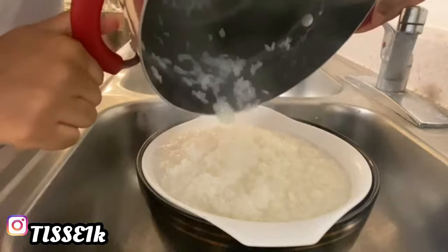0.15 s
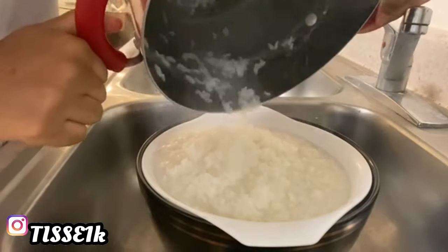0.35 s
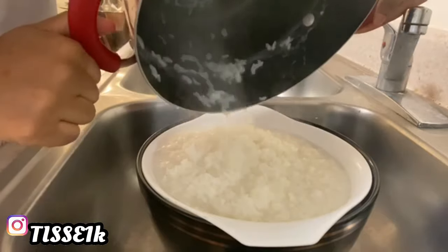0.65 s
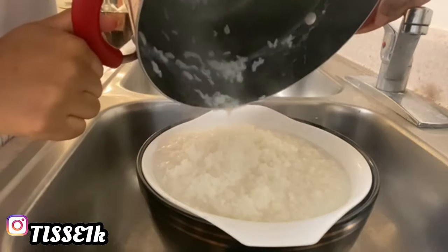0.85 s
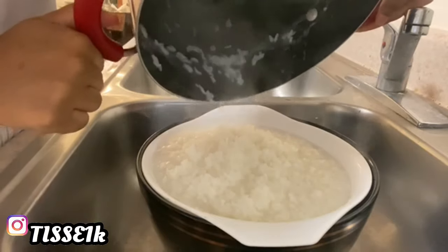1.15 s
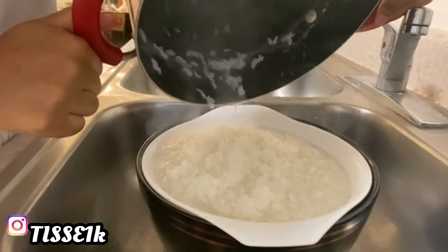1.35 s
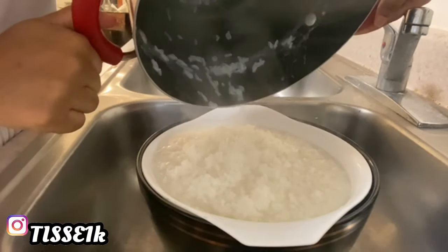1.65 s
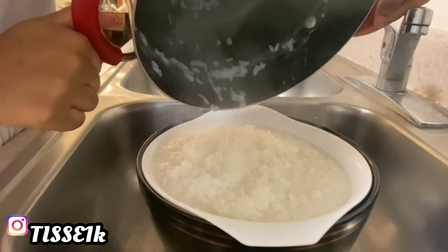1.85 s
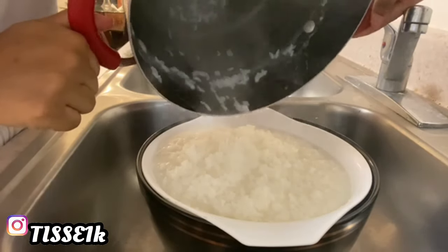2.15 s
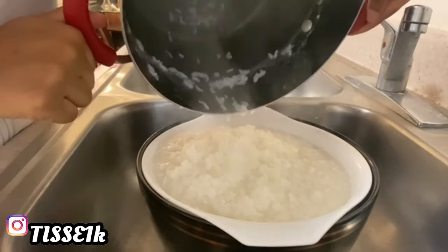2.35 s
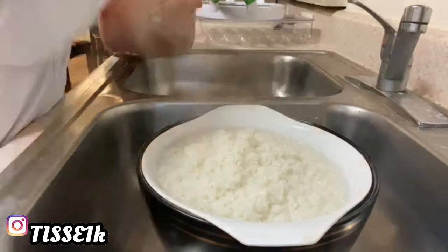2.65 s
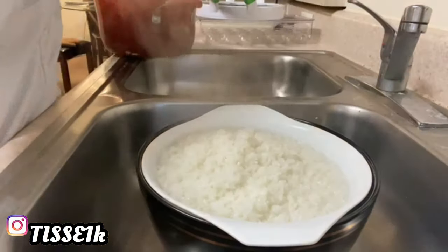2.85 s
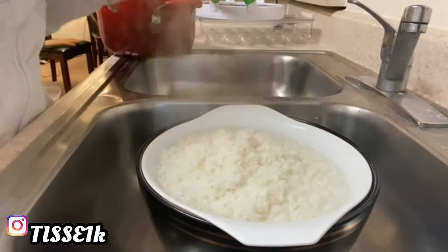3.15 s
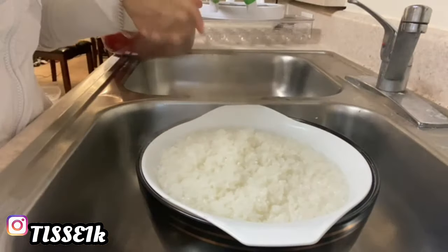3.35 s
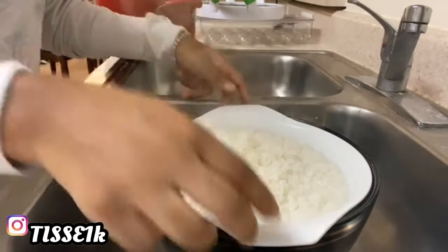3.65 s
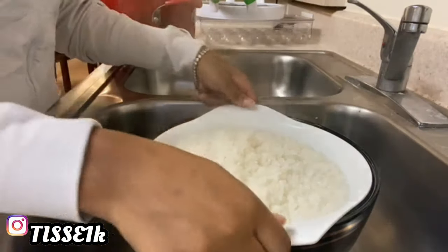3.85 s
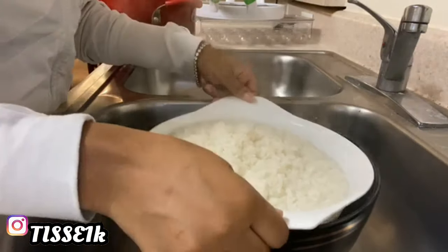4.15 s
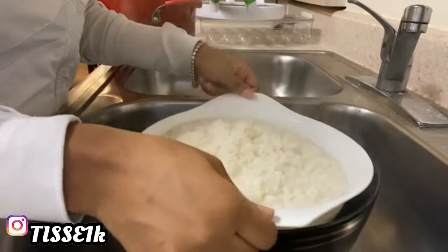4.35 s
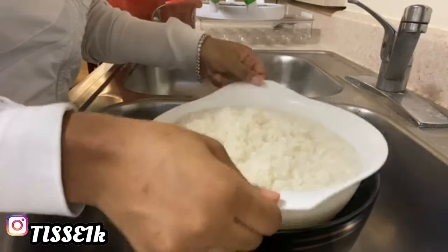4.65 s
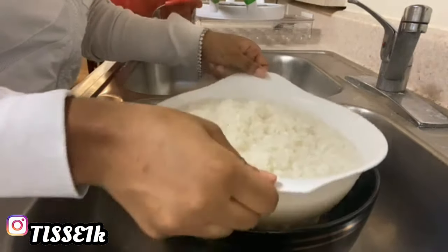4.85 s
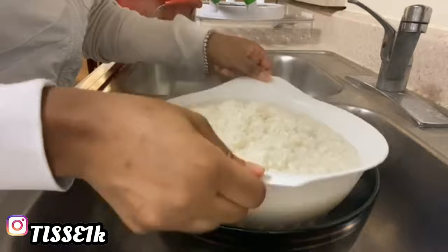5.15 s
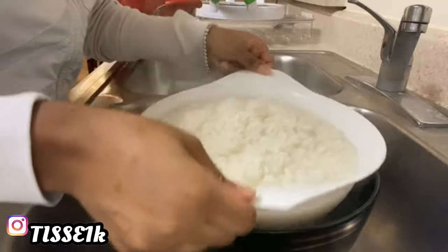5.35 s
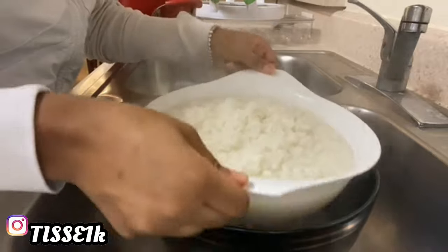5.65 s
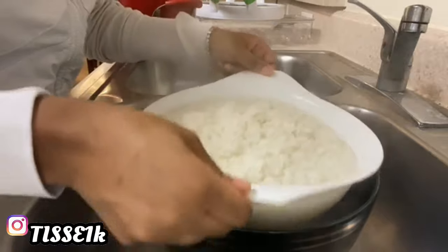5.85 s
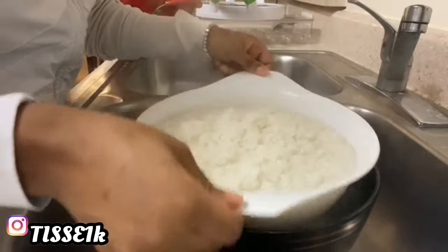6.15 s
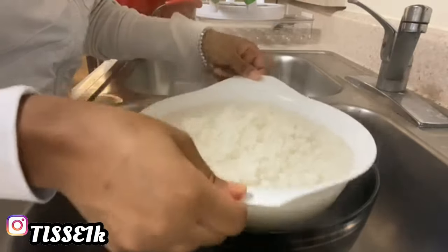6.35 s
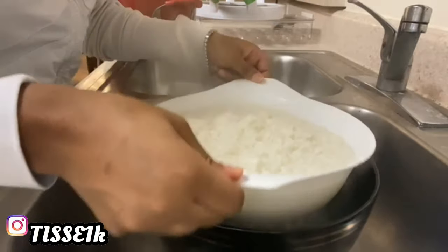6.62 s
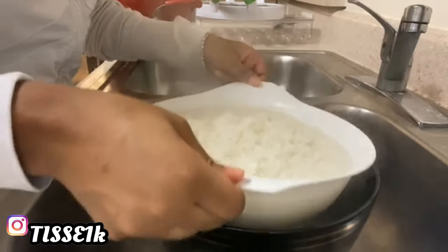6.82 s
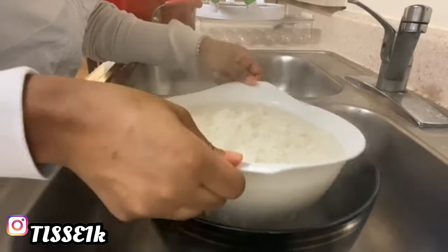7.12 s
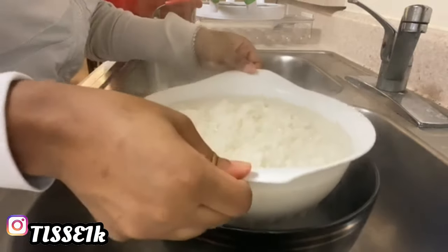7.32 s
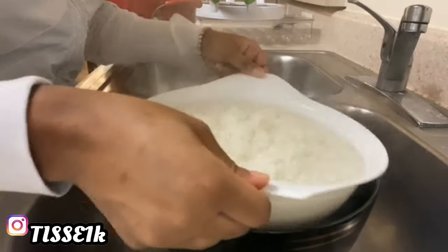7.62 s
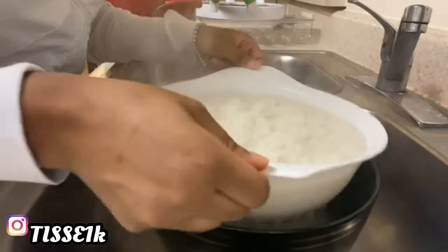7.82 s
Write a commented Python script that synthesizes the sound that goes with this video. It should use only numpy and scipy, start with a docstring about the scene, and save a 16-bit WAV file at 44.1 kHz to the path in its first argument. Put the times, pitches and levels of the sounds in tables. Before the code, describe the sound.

In a small tiled kitchen, a fan hums low with soft hiss. A few hollow plastic knocks boom in a steel sink, the level dips briefly, and a pan is set down further off. Hands grip a colander of rice and clack it against the pot, which rings shortly. Bracelet beads tick during shaking, then a sharp double knock. Close stereo microphone, short room echo.

```python
"""A plastic colander of rice knocks against a pot in a steel kitchen sink: noise bursts shake the plastic wall,
fading sine waves ring the sink sheet and the pot, and sharp snaps and low thuds join them. A pan is set down
further off, bracelet beads tick in high resonances, and hands slide as swelling grainy noise.
Behind them a fan hums and hisses in a small tiled kitchen. Once the level dips briefly, and the hiss is a
little louder afterwards."""
import sys
import numpy as np
from scipy import signal
from scipy.fft import rfft, irfft, next_fast_len
from scipy.io import wavfile
from scipy.ndimage import uniform_filter1d, map_coordinates

SR = 44100
rng = np.random.default_rng(int(sys.argv[2]) if len(sys.argv) > 2 else 0)


def int16_out(signal):
    """Quantize to a 16-bit WAV file."""
    q = np.round(np.clip(np.atleast_2d(signal).T, -1, 1) * 32767)
    wavfile.write(sys.argv[1], SR, q.astype(np.int16))


N = 351824  # length in samples


def amp(db):
    """Turns a level in dB into a gain."""
    return 10 ** (np.asarray(db) / 20)


def unit(x):
    """Scales a sound to rms 1."""
    return x / np.sqrt(np.mean(x ** 2) + 1e-20)


def peaked(x, db):
    """Scales a sound to a peak level in dB."""
    return amp(db) * x / np.abs(x).max()


def along(points, hz):
    """Reads a curve of (Hz, value) points on a log frequency axis."""
    f, v = np.transpose(points)
    return np.interp(np.log(hz + 1), np.log(f + 1), v)


def wobble(rate, size=N):
    """Draws a smooth random curve with 'rate' random points a second."""
    knots = rng.standard_normal(int(size * rate / SR) + 4)
    return map_coordinates(knots, [np.arange(size) * rate / SR])


def filtered(x, response):
    """Multiplies the spectrum of x by a response, given as a function of frequency."""
    n = x.shape[-1]
    m = next_fast_len(n + 8192)  # spare room for the filter to ring out
    return irfft(rfft(x, m) * response(np.fft.rfftfreq(m, 1 / SR)), m)[..., :n]


def resonances(peaks):
    """Response of a body with (Hz, width Hz, dB) resonances, which ring only after the push."""
    def response(f):
        total = 0
        for k, (centre, width, db) in enumerate(peaks):
            peak = 1j * f * width / (centre * centre - f * f + 1j * f * width)
            total = total + (-1) ** k * amp(db) * peak  # neighbours have opposite signs
        return total
    return response


# How alike the background noise is on the left and right.
# Each row: frequency in Hz, likeness (1 is the same, 0 is unrelated).
LIKENESS = [(25, 0.82), (60, 1), (130, 0.9), (290, 1), (640, 0), (1400, 0.02)]


def rush(response, patchy_db=0):
    """Stereo noise of rms 1 in patches of random gain, alike in the bass and unrelated in the treble."""
    z = signal.stft(rng.standard_normal((2, N)), nperseg=2048)[2]
    patches = uniform_filter1d(rng.standard_normal(z.shape[1:]), size=5, axis=0)
    patches = uniform_filter1d(patches, size=5, axis=1)
    pair = signal.istft(z * amp(patchy_db * unit(patches)), nperseg=2048)[1][:, :N]

    def middle_and_side(hz):
        turn = np.arccos(np.clip(along(LIKENESS, hz), -1, 1)) / 2
        return response(hz) * [np.cos(turn), np.sin(turn)]
    mid, side = filtered(pair, middle_and_side)
    return unit(np.array([mid + side, mid - side]))


def wavering(peaks, waver_db):
    """Narrow bands of noise, each swelling and fading on its own."""
    total = 0
    for hz, width, db in peaks:
        total = total + amp(db + waver_db * wobble(4.0)) * rush(resonances([(hz, width, 0)]))
    return total


LAG_S = .00029  # knocks and rings arrive this much later on the left


def lagged(f):
    """Delays the left side only, by turning its phase."""
    return np.exp(-2j * np.pi * f * LAG_S * np.array([[1], [0]]))


def ring(modes, t, scatter_db, colour_db, rise, blur):
    """Fading sine waves of a struck body, with random strengths and wandering phase, later on the left."""
    shifted = t - LAG_S / 2 * np.array([[1], [-1]])
    total = 0
    for hz, db, t60 in modes:
        level = db + colour_db(hz) + rng.normal(0, scatter_db)
        phase = 2 * np.pi * hz * shifted + blur * wobble(47.8, size=len(t))
        total = total + amp(level - 60 * t / t60) * np.sin(phase)
    return total * (1 - np.exp(-(t / rise) ** 2))


def burst(t, t60, alike, rise=0.00022):
    """A stereo rattle of noise that rises fast and dies; 'alike' is the share common to both sides."""
    noise = rng.standard_normal((3, len(t)))
    mixed = alike * noise[2] + (1 - alike) * noise[:2]
    return (1 - np.exp(-(t / rise) ** 2)) * amp(-60 * t / t60) * mixed


# How long the tiled kitchen echoes. Each row: frequency in Hz, time to fall by 60 dB in seconds.
ECHO_TIMES = [(200, 0.62), (1000, 0.29), (4000, 0.31), (12000, 0.2)]


def echoed(x, wet_db):
    """Adds the kitchen's answer: a noise tail in which each frequency dies at its own speed."""
    hz, t, z = signal.stft(rng.standard_normal((2, SR // 3)), SR, nperseg=256)
    fading = amp(-60 * t / along(ECHO_TIMES, hz)[:, None])
    tail = signal.istft(z * fading, SR, nperseg=256)[1]
    delayed = np.pad(x, ((0, 0), (250, 0)))  # the answer starts 250 samples late
    wet = signal.fftconvolve(delayed, tail / np.linalg.norm(tail[0]), axes=1)
    return x + amp(wet_db) * wet[:, :x.shape[1]]


def add(out, s, x, pan_db=0):
    """Places a stereo sound at s seconds; a positive pan_db leans left."""
    part = out[:, round(s * SR):][:, :x.shape[1]]
    part += (x * amp([[pan_db / 2], [-pan_db / 2]]))[:, :part.shape[1]]


# Tone colour of the low rumble. Each row: frequency in Hz, relative level in dB per Hz.
RUMBLE_COLOUR = [(15, -48), (27, -8), (40, -15), (58, 1.5), (90, -1), (123, -25.5), (147, -10), (236, -13),
                 (333, -18), (400, -15.5), (500, -27), (700, -37), (1500, -120)]
# Room resonances that the fan excites. Each row: frequency in Hz, width in Hz, relative level in dB.
ROOM_BOOM = [(196, 8.7, 0), (234.3, 10.4, 0), (286.5, 12, -3), (368.3, 10.2, -3), (438, 26, -11.5),
             (622, 18, -22.5)]
# The fan's hum. One row: frequency in Hz, width of its blurred part in Hz, level of the blurred part in dB,
# middle level of the steady part in dB.
FAN_HUM = (119, 14, -42.5, -49.5)
# Tone colour of the hiss. Each row: frequency in Hz, relative level in dB per Hz.
HISS_COLOUR = [(300, -23), (450, -25), (610, -6), (760, -14), (877, -7.5), (1010, -12.5), (1260, -4.5),
               (1650, -22.5), (1830, -14.5), (2140, -13), (2800, -10.5), (3660, -15.5), (7400, -16),
               (9500, -21), (11500, -26), (14300, -25.5), (15300, -52)]
# Blurred fan tones. Each row: frequency in Hz, width in Hz, relative level in dB.
FAN_WHINE = [(1300, 20, -4), (1830, 59, -3.5), (3290, 85, -17), (4170, 70, -9)]
# The brief dip in level. One row: its middle in seconds, half its length in seconds.
DIP = (2.594, .035)
RUMBLE_DB, BOOM_DB, WHINE_DB = -41.5, -59, -63
HISS_DB, HISS_STEP_DB = -55.5, 2  # the step lifts the hiss after the middle of the dip


def room_tone():
    """Fan rumble with its hum and the room's boom, and the hiss of air and microphone with the fan's whine."""
    t = np.arange(N) / SR
    rumble = amp(RUMBLE_DB + 2.0 * wobble(2.632)) * rush(lambda f: amp(along(RUMBLE_COLOUR, f)), patchy_db=2.5)
    rumble += amp(BOOM_DB) * wavering(ROOM_BOOM, waver_db=2.5)

    hz, width, blurred_db, steady_db = FAN_HUM
    hum = amp(blurred_db) * rush(lambda f: resonances([(hz, width, 0)])(f) ** 2)
    hum += amp(steady_db + 4.2 * wobble(23.0)) * np.sin(2 * np.pi * hz * t + 0.12 * wobble(3.4))

    hiss_db = HISS_DB + HISS_STEP_DB * (t > DIP[0])
    hiss = amp(hiss_db + 1.17 * wobble(3.716)) * rush(lambda f: amp(along(HISS_COLOUR, f)), patchy_db=2.86)
    hiss += amp(WHINE_DB) * wavering(FAN_WHINE, waver_db=1.5)

    # rumble and hum are 2 dB softer on the left and 18 samples later on the right
    left, right = rumble + hum
    return np.array([amp(-2.0) * left, np.roll(right, shift=18)]) + hiss


# Hands and plastic rubbing. Each row: time of the fullest swell in seconds, fade in seconds,
# level in dB before the swell shapes it, centre in Hz, width as a share of the centre.
HAND_RUBS = [(1.1, 0.22, -58.5, 1560, 1.1), (2.79, 0.17, -49, 800, 0.66), (3.149, 0.16, -55, 1610, 2.1),
             (3.638, 0.095, -58, 1290, 0.35), (4.099, 0.057, -56, 7000, 1.4),
             (4.72, 0.086, -62, 2970, 0.095), (4.72, 0.056, -62, 1250, .3),
             (4.85, 0.081, -59.5, 2760, 0.41), (4.93, 0.15, -60, 1360, 0.12), (4.8, 0.17, -54.5, 600, 1.5),
             (4.99, 0.066, -58.5, 2660, 0.13), (5.18, 0.038, -53.5, 3780, 0.84),
             (7.6, 0.31, -59.5, 7000, 0.6), (7.76, .07, -53.5, 7700, 0.39), (7.92, 0.58, -53, 7300, 0.57)]
RUB_RISE = .55  # length of the swell as a share of the fade


def sliding():
    """Grainy friction: noise in uneven lumps that swells and fades around one resonance."""
    out, t = np.zeros((2, N)), np.arange(SR) / SR - .4  # time 0 is the fullest point
    for s, fade, db, hz, share in HAND_RUBS:
        lumps_db = 2.3 * wobble(70, size=SR) + 2 * wobble(22, size=SR)
        grains = rng.standard_normal((2, SR)) * amp(lumps_db)
        swell = np.exp(-(t / np.where(t < 0, RUB_RISE * fade, fade)) ** 2)
        body = resonances([(hz, share * hz, 0)])
        rub = unit(filtered(grains, lambda f: body(f) ** 2))
        add(out, s + t[0], amp(db) * swell * rub)
    return out


# Clicks of single bracelet beads. Each row: start in seconds, peak of the click in dB before the echo,
# peak of the upper ring in dB over the click.
BEAD_TICKS = [(1.193, -39, -18), (2.874, -42, -3), (3.909, -34, -15), (4.6734, -38, -17), (5.0374, -51, 6),
              (5.0923, -54, 2), (5.188, -44, -1), (5.349, -41.5, 1), (5.4824, -49, 11), (5.517, -38, -6),
              (5.5742, -51, 4), (6.1762, -43.5, 5), (6.2701, -45, -12), (6.342, -41.5, 1),
              (6.3889, -49, -10), (6.4183, -45.5, 13), (6.526, -43, -22), (6.571, -39, -2),
              (6.7507, -41, -5), (6.8027, -43, 3), (6.8423, -46, -10), (7.228, -50, 3), (7.7393, -45, -1),
              (7.9144, -48, 2), (7.9265, -45, 0)]
# The lower and the upper ring of the beads. Each row: frequency in Hz, width in Hz.
BEAD_RINGS = [(8000, 280), (13300, 150)]
# Short shivers of many beads while the colander is shaken. Each row: middle in seconds,
# level of the upper ring in dB before the swell and the echo.
BEAD_SHIVERS = [(5.7, -55), (5.99, -64), (6.09, -57), (6.201, -63), (6.282, -58), (6.427, -51),
                (6.521, -56), (6.678, -59), (6.832, -56)]
BEAD_T60_S, LOWER_RING_DB = 0.079, -5  # fall of the rattle by 60 dB; lower ring against the click
SHIVER_HALF_S, SHIVER_LOWER_DB = .033, -4  # half width of the swell; lower ring against the upper


def bracelet():
    """Tiny hard beads click, and rattle in two high resonances."""
    out, t = np.zeros((2, N)), np.arange(SR // 6) / SR
    lower, upper = (resonances([(hz, width, 0)]) for hz, width in BEAD_RINGS)
    for s, db, upper_db in BEAD_TICKS:
        low, high = 1 + 0.06 * rng.standard_normal(2)  # no two beads click alike
        snap = resonances([(8500 * low, 1500, 0), (12900 * high, 2500, 0)])
        click = filtered(burst(t, 0.016, 0.9, 0.00059), lambda f: snap(f) ** 2)
        add(out, s, peaked(click, db))
        add(out, s, peaked(filtered(burst(t, BEAD_T60_S, 0.74), lower), db + LOWER_RING_DB))
        add(out, s, peaked(filtered(burst(t, BEAD_T60_S, 0.51), upper), db + upper_db))
    middle = t[-1] / 2
    for s, db in BEAD_SHIVERS:
        grains = rng.standard_normal((2, len(t))) * amp(1.6 * wobble(143, size=len(t)))
        shiver = amp(SHIVER_LOWER_DB) * unit(filtered(grains, lower))
        shiver = shiver + unit(filtered(grains[0], upper))  # the upper ring is the same on both sides
        swell = np.exp(-((t - middle) / SHIVER_HALF_S) ** 2)
        add(out, s - middle, amp(db) * shiver * swell)
    return echoed(out, -13)


# A pan set down further off. Each row: start in seconds, peak in dB before the echo.
FAR_PAN_TAPS = [(2.6558, -34), (2.8622, -31), (2.8752, -24), (2.889, -34), (2.938, -35.5), (3.108, -42),
                (3.187, -41.5)]
# Resonances of that pan. Each row: frequency in Hz, width in Hz, relative level in dB.
PAN_BODY = [(1560, 170, 5), (2300, 1100, -12), (3190, 120, -1), (4200, 340, -6), (4940, 840, -14.5),
            (7800, 950, -12.5)]


def pan():
    """Dull metal taps: short noise bursts through the pan's resonances, partly heard through the room."""
    out, t = np.zeros((2, N)), np.arange(SR // 3) / SR
    for s, db in FAR_PAN_TAPS:
        tap = filtered(burst(t, 0.02, 0.7, 0.0015), resonances(PAN_BODY))
        add(out, s, echoed(peaked(tap, db), -2))
    return out


# Soft weight shifts that flex the sink floor. Each row: start in seconds, strength in dB before it
# rises and dies, pitch in Hz.
FLOOR_THUDS = [(2.218, -15, 123), (2.267, -22, 86.5), (2.892, -16, 134), (3.621, -8.5, 113),
               (3.689, -12, 124), (3.849, -7, 120), (3.7, -11, 45), (3.87, -20, 48), (3.947, -16, 124),
               (4.165, -11.5, 103), (4.191, -10, 49.3), (4.247, -15, 117.4), (4.8, -25, 107),
               (5.034, -20.5, 112), (5.734, -16, 89.5), (5.756, -7.5, 75.5), (5.8, -10, 73),
               (6.924, -9, 110), (6.94, -11, 51.4), (6.965, -13.5, 95), (7.005, -19.5, 128.5)]
THUD_RISE_CYCLES, THUD_T60_S = 1.6, 0.11  # build-up in cycles; fall by 60 dB in seconds


def thuds():
    """The sink floor swings a few times at a low pitch."""
    out, t = np.zeros((2, N)), np.arange(SR // 2) / SR
    for s, db, hz in FLOOR_THUDS:
        rise = 1 - np.exp(-(t * hz / THUD_RISE_CYCLES) ** 2)
        swing = rise * amp(db - 60 * t / THUD_T60_S) * np.sin(2 * np.pi * hz * t)
        add(out, s, np.array([swing, swing]), -1.6)
    return out


# Colander against pot and sink. Each row: start in seconds, peak of the clack in dB before echo and panning,
# its lowest frequency in Hz, its treble slope in dB an octave, its time to fall by 60 dB in seconds,
# strength of the sink in dB, the sink pitch in Hz that the spot favours.
COLANDER_KNOCKS = [(1.192, -33, 800, 0.5, 0.042, -56, 392), (1.909, -54, 300, -6, .05, -50, 282),
                   (2.211, -28.5, 1400, -12.5, 0.082, -40, 517),
                   (2.219, -26.5, 710, -10.5, 0.11, -38.5, 308), (2.232, -32.5, 1300, -11, 0.078, -43, 388),
                   (2.247, -35, 1100, -11, .06, -49, 330), (2.256, -41, 600, -4, 0.51, -50.5, 300),
                   (3.612, -63, 300, -7, .046, -39, 257), (3.696, -36.5, 400, -1.5, 0.079, -41.5, 288),
                   (3.825, -34, 400, -22, 0.06, -40, 590), (3.838, -23, 700, -26, 0.076, -29.5, 384),
                   (3.846, -34, 700, -14, 0.04, -37.5, 320), (3.869, -34, 600, -18, 0.11, -33, 624),
                   (3.885, -53, 400, -20, 0.045, -38.5, 232), (3.908, -28.5, 1290, 0.5, 0.058, -38.5, 433),
                   (3.982, -40, 400, -11, 0.055, -39, 514), (4.073, -36, 400, 1, 0.1, -43, 614),
                   (4.151, -29, 2400, -20, 0.02, -53, 433), (4.158, -24, 2500, -11, 0.019, -42, 430),
                   (4.163, -20.5, 2190, -13, 0.051, -45, 486), (4.184, -52, 600, -8, .046, -39.5, 430),
                   (4.204, -30.5, 800, -33, 0.047, -41.5, 570), (4.612, -52, 400, -21, 0.036, -58, 470),
                   (4.697, -43.5, 700, -7, .06, -61, 520), (4.742, -53, 400, -14, .05, -59, 560),
                   (4.8, -45, 400, -10, 0.06, -59, 620), (4.93, -55, 400, -15, .05, -48.5, 474),
                   (4.957, -41, 500, -19, 0.05, -49, 636), (4.99, -42, 400, -9, 0.062, -54, 600),
                   (5.018, -48, 400, -12, .05, -54, 560), (5.735, -43, 300, -15, 0.059, -49, 300),
                   (5.765, -43, 300, -9, 0.08, -47, 330), (5.808, -45, 300, -12, 0.065, -53, 322),
                   (6.267, -41, 406, -6, 0.048, -53, 427), (6.908, -23.5, 1500, -14.5, 0.074, -45, 503),
                   (6.925, -9, 1180, 0, 0.021, -35.5, 490), (6.929, -10.5, 1490, 4, 0.018, -36.5, 473),
                   (6.933, -14.5, 1600, -4, 0.025, -37.5, 530), (6.951, -31, 400, -15, 0.054, -39.5, 553),
                   (6.989, -49, 400, -12, .06, -54, 488), (7.02, -40, 400, -11, .06, -44.5, 436)]
# Resonances of the plastic wall. Each row: frequency in Hz, width in Hz, relative level in dB.
PLASTIC_WALL = [(490, 74, 5), (850, 174, 13.5), (1300, 77, 16), (1642, 90, 9), (2250, 330, 6),
                (3250, 460, 2), (4800, 1100, -2), (7300, 910, -1.5), (8710, 520, -2), (13300, 1600, -11)]
# Tones of the sink sheet. Each row: frequency in Hz, relative level in dB, time to fall by 60 dB in seconds.
SINK_SHEET = [(227, 12, 0.16), (287.3, 3, 0.49), (329, 12, 0.063), (360, 10.5, 0.074), (442, 1, 0.39),
              (500, 4.5, 0.15), (560, 11, 0.079), (600, 9, 0.15), (620, 6.5, 0.09), (766, -1, 0.063)]
# Hard edges meeting in one sharp snap. Each row: start in seconds, peak in dB before echo and panning,
# centre in Hz.
EDGE_SNAPS = [(2.2145, -30.5, 1190), (2.222, -28.5, 1700), (3.8451, -32, 800), (3.985, -41, 620),
              (4.1577, -14.5, 1770), (4.718, -49, 2200), (4.802, -44, 1800), (4.961, -54, 850),
              (5.0, -43, 1500), (5.02, -46, 1300), (6.91, -28, 1300), (6.9375, -19, 2300)]
# Tones of the pot. Each row: frequency in Hz, relative level in dB, time to fall by 60 dB in seconds
# before the grip shortens it.
POT_TONES = [(1126, 0, .95), (1303, -18, .3), (2090, -25, .6), (2200, 7, .06), (2466, 10, .055),
             (2870, 3, .06), (3200, 2, .05), (3600, 7, .03), (4600, 4, .025)]
# Knocks that catch the pot's rim. Each row: start in seconds, ring in dB, time in seconds that the hand's
# grip leaves the first tone to fall by 60 dB, slope in dB an octave.
RIM_BLOWS = [(4.1572, -29.5, 0.85, -1), (4.1645, -46, 0.85, 2), (6.9095, -24, 0.55, -9),
             (6.93, -31, 0.55, -3)]
RISE_CYCLES, KNOCK_PAN_DB = 4.8, -0.5  # build-up in cycles of the lowest frequency; slightly to the right
SPOT_DB, SINK_RISE_S = -16.5, .006  # change of a sink tone one octave from the favoured pitch; build-up
SNAP_SHARE = .8  # width of a snap as a share of its centre


def knocks():
    """Each contact rattles the plastic wall and booms in the sink sheet; some snap or ring the pot."""
    out, t = np.zeros((2, N)), np.arange(SR) / SR
    short = t[:SR // 3]
    for s, db, low_hz, slope_db, t60, sink_db, spot_hz in COLANDER_KNOCKS:
        def wall(f):
            # a softer contact passes less treble, a smaller one less bass
            treble = amp(slope_db * np.log2(1 + f / 700))
            bass = (f / (f - 1j * low_hz)) ** 4
            return resonances(PLASTIC_WALL)(f) * treble * bass * lagged(f)
        clack = filtered(burst(short, t60, 0.37, RISE_CYCLES / low_hz), wall)
        add(out, s, echoed(peaked(clack, db), -7.0), KNOCK_PAN_DB)
        spot_db = lambda hz: SPOT_DB * np.log2(hz / spot_hz) ** 2
        boom = ring(SINK_SHEET, short, 2.5, spot_db, SINK_RISE_S, blur=1.0)
        add(out, s, amp(sink_db) * boom, KNOCK_PAN_DB)
    for s, db, hz in EDGE_SNAPS:
        edge = resonances([(hz, SNAP_SHARE * hz, 0)])
        click = np.outer([1, 1], short == 0)  # a single sample
        snap = filtered(click, lambda f: edge(f) ** 3)
        add(out, s, echoed(peaked(snap, db), -15.5), KNOCK_PAN_DB)
    for s, db, held_s, slope_db in RIM_BLOWS:
        colour_db = lambda hz: slope_db * np.log2(hz / 400)
        blow = ring(POT_TONES, t, 0.36, colour_db, rise=0.00036, blur=0.13)
        grip_db = -60 * t * (1 / held_s - 1 / POT_TONES[0][2])  # the hand makes every tone die sooner
        add(out, s, amp(db + grip_db) * blow, KNOCK_PAN_DB)
    return out


def scene():
    """Everything in the kitchen, with the brief dip to 3 percent of the level."""
    s, half = DIP
    fade = np.clip(np.abs(np.arange(N) / SR - s) / half, .03, 1)
    return fade * (room_tone() + sliding() + bracelet() + pan() + thuds() + knocks())


def record(dry):
    """The treble rolls off steeply around 14500 Hz, and nothing is kept from 16000 Hz up."""
    return filtered(dry, lambda hz: (hz < 16000) / np.sqrt(1 + (hz / 14500) ** 48))


dry = scene()
out = record(dry)
int16_out(out)
```